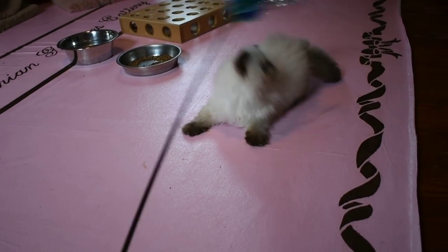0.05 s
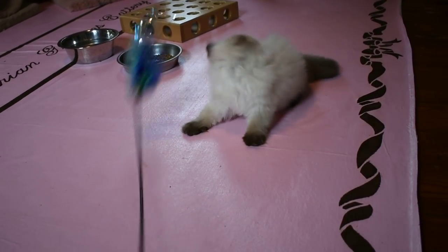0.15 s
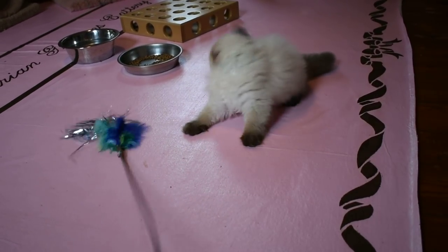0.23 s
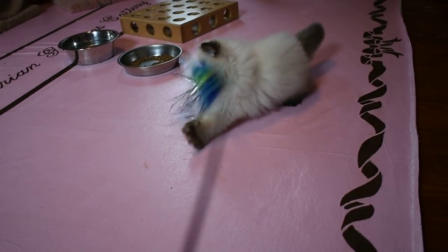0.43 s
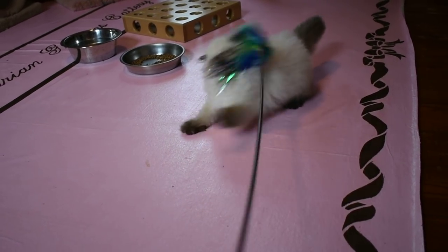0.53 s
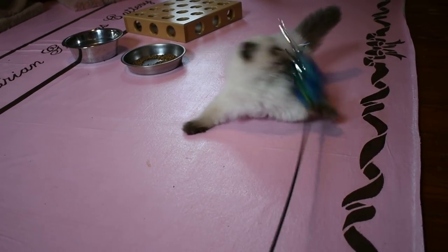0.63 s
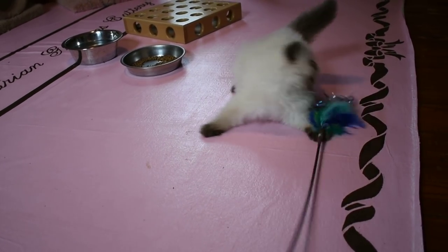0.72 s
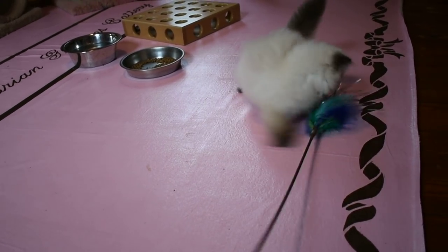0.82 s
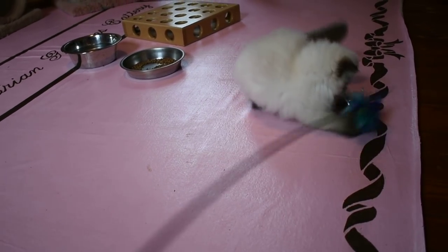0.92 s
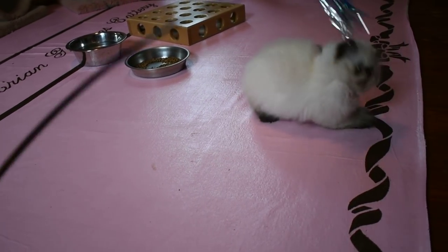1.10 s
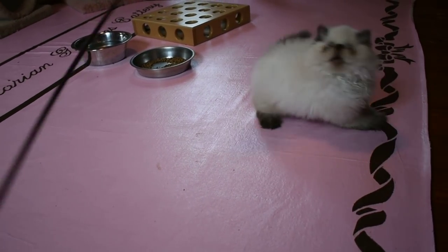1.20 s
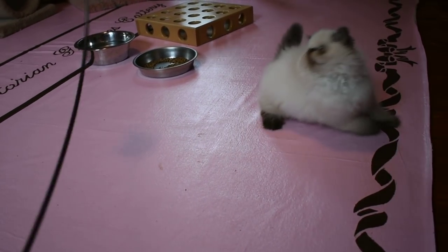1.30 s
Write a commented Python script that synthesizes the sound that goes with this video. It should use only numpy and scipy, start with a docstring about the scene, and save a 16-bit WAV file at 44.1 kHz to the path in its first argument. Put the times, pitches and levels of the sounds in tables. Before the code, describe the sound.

Close microphone in a small bare room: a cat wand toy lands with a sharp cracking smack, crisp foil rustles, quills scratch the mat with small snaps, soft paw thuds and a brief airy whoosh follow.

```python
"""A feather and tinsel cat toy on a thin rod slaps down on a plastic floor mat with hard snaps: short rings with cracks.
Its feathers land as puffs of noise, its tinsel fizzes with tiny ticks, and its quills scrape as ringing grit.
The toy also whips through the air as bands of noise. Soft low thuds are dull noise: two under the slap, the rest
like padded paws. The bare room adds an echo to each of these, over faint air noise, hums and a low rumble."""
import sys
import numpy as np
from scipy import signal
from scipy.fft import rfft, irfft, next_fast_len
from scipy.io import wavfile
from scipy.ndimage import map_coordinates

SR = 44100
rng = np.random.default_rng(int(sys.argv[2]) if len(sys.argv) > 2 else 0)


def generate_wav(signal):
    """Clip the signal to [-1, 1] and save it as 16-bit WAV at the path in sys.argv[1]."""
    frames = np.transpose(np.atleast_2d(signal))
    scaled = np.clip(frames, -1, 1) * 32767
    pcm = np.round(scaled).astype(np.int16)
    wavfile.write(sys.argv[1], SR, pcm)


N = 59535

# How long the echo takes to fall by 60 dB: [f/Hz, time/s]
ROOM_FADE_TIMES = [(100, 0.38), (300, 0.45), (800, 0.49), (3000, 0.47), (6000, 0.39), (14000, 0.4)]
ROOM_BUILD_S, ROOM_CHANGES_PER_S = 0.013, 60
TOP_HZ = 15800

# Tone colour of the room air: [f/Hz, level/dB]
AIR_COLOUR = [(25, -31), (60, -3.5), (150, -2), (240, 3), (340, 2), (500, -5.5), (1000, -6.5), (3000, -10),
              (9000, -12), (15000, -19)]
AIR_DB = -54
# Wavering low hums, one of them fading: [f/Hz, level at the start/dB, change of level/(dB per s)]
HUMS = [(102.5, -62.5, -6.5), (233.6, -63, -0.5)]
# Loudness of the low rumble over time: [t/s, level/dB]
RUMBLE_LEVELS = [(0, -71), (.7, -72), (.85, -69), (1.25, -68), (1.35, -80)]
# Tone colour of the rumble: [f/Hz, level/dB]
RUMBLE_COLOUR = [(15, -17), (35, -12), (60, -2), (90, 5), (200, -38), (1000, -90)]

# Soft low thuds, two dull ones under the slap, the rest like padded paws: [t/s, level/dB, f/Hz]
THUDS = [(0.237, -33, 338), (0.297, -45, 328), (.541, -43, 226), (.568, -48.5, 324), (.63, -45.5, 353),
         (1.17, -71, 300), (1.199, -54, 213)]
# Tone colour of a thud: [multiple of its pitch, level/dB]
THUD_COLOUR = [(.15, -36), (.7, -16), (1, 6), (1.3, -11), (1.7, -11), (2.3, -12), (4, -13), (11, -34)]
THUD_RISE_S, THUD_DECAY_S, THUD_ROOM_DB = 0.003, 0.033, -1.5

# Swings through the air: [t of the loudest moment/s, width/s, level/dB, f/Hz, glide/(octaves per s)]
SWINGS = [(0.539, 0.012, -52, 790, -8), (0.994, 0.029, -42, 1380, 11), (1.189, 0.04, -53, 1210, 14)]
SWISH_OCTAVES, SWISH_ROOM_DB = 0.89, -2.5

# Quills scraping along the mat: [start t/s, t when the fall begins/s, level/dB, quill ring f/Hz]
SCRAPES = [(0.569, 0.583, -46, 4580), (0.587, 0.705, -55, 3400), (0.702, .717, -30.5, 3550),
           (0.715, 0.768, -35.5, 3230), (0.771, 0.8, -41, 3360), (0.796, 0.811, -33.5, 4200),
           (0.811, 0.831, -36, 3000), (0.836, 0.87, -36.5, 4020), (0.854, 0.988, -46, 3270),
           (0.923, .934, -41, 3520), (1.165, 1.195, -48.5, 4100), (1.192, 1.201, -43.5, 3940)]
# Tone colour of the scraping grit: [f/Hz, level/dB]
SCRAPE_COLOUR = [(40, -36), (200, -17), (450, -14.5), (700, -1.5), (1100, -6), (1700, -1.5), (2600, -3),
                 (5000, -2), (8500, -3), (12000, -13), (15500, -18)]
SCRAPE_RISE_S, SCRAPE_FALL_S, SCRAPE_ROOM_DB = 0.0022, 0.0037, -5
SCRAPE_PER_S, SCRAPE_SPREAD_DB = 4000, 2.5
QUILL_Q, QUILL_DB = 2.7, -2.5  # sharpness of the ring, and its level against the grit

# How hard the tinsel shakes over time: [t/s, level/dB]
TINSEL_LEVELS = [(0, -51), (.2, -54.5), (.216, -48), (.235, -48), (0.238, -36), (.278, -31.5), (.295, -39),
                 (.33, -46.5), (.365, -38), (.44, -48), (.48, -46), (.57, -43.5), (.595, -75), (.64, -67),
                 (.68, -49.5), (.745, -47), (.79, -51.5), (0.891, -59), (.91, -47.5), (1.02, -48.5),
                 (1.09, -52.5), (1.12, -52), (1.23, -51.5), (1.27, -64), (1.35, -55)]
# Tone colour of the tinsel: [f/Hz, level/dB]
TINSEL_COLOUR = [(300, -37), (2000, -6.5), (4500, -3.5), (8500, 2.5), (12500, 2.5), (15500, -8)]
TINSEL_PER_S, TINSEL_SPREAD_DB, TINSEL_ROOM_DB = 7000, 7.5, -7

# The bundle of feathers slapping flat and settling: [t/s, level/dB, decay/s]
SLAPS = [(0.2363, -21, 0.013), (0.255, -28, 0.028), (0.297, -25.5, .004)]
# Tone colour of the feathers: [f/Hz, level/dB]
SLAP_COLOUR = [(30, -46), (90, -15.5), (170, -3), (230, 0), (340, 4), (490, 0), (800, 5.5), (1200, -1.5),
               (1800, 1), (3200, -2.5), (5000, -12), (15000, -23)]
SLAP_RISE_S, SLAP_ROOM_DB = 0.00035, -0.5

# Hard parts of the toy snapping on the mat: [t/s, level/dB, ring f/Hz, crack level against the ring/dB]
SNAPS = [(0.119, -15, 10000, -3), (0.123, -15.5, 9150, -10), (0.213, -22, 11500, -13),
         (0.2403, -1, 6700, -3.5), (.2457, -10, 3770, 5), (.2552, 7, 3310, -9.5), (.2739, 1, 2950, -6),
         (.2829, -5, 8600, -7), (.6990, -20, 3900, -19), (0.705, -8, 5100, -12), (.7080, -7, 3820, -24),
         (0.7118, -12.5, 3460, -26), (0.7155, -27, 4000, -14), (.8485, -22, 4400, 1),
         (0.854, -10, 3850, -27), (0.862, -17, 4250, -1), (0.8646, -8, 4860, -4.5), (0.866, -16, 3900, -15)]
SNAP_RISE_S, CRACK_S, SNAP_ROOM_DB = 0.00004, 0.00015, -9.5
SNAP_CYCLES = 0.87  # decay time of the ring, in cycles
SNAP_LOW_SHARE = 0.37  # bass is cut below this share of the ring pitch


def amp(db):
    """Turn decibels into a gain."""
    return 10 ** (np.asarray(db) / 20)


def unit(x):
    """Scale a sound to an average strength (rms) of 1."""
    return x / np.sqrt(np.mean(x ** 2) + 1e-20)


def clock():
    """Give the time of each sample in seconds."""
    return np.arange(N) / SR


def level_curve(points):
    """Join (time, dB) points with straight lines and give the gain at each sample."""
    return amp(np.interp(clock(), *np.transpose(points)))


def along(points, hz):
    """Read a value between (Hz, value) points on a log frequency axis."""
    f, v = np.transpose(points)
    return np.interp(np.log(hz + 1), np.log(f + 1), v)


def filtered(x, response):
    """Make each frequency of x louder or softer by the response."""
    size = next_fast_len(N + 8192)
    spectrum = rfft(x, size) * response(np.fft.rfftfreq(size, 1 / SR))
    return irfft(spectrum, size)[:N]


def coloured(x, colour):
    """Give x a tone colour, at rms 1."""
    return unit(filtered(x, lambda hz: amp(along(colour, hz))))


def noise(colour):
    """Make smooth noise with a tone colour."""
    return coloured(rng.standard_normal(N), colour)


def crackle(colour, per_s, spread_db):
    """Scatter many tiny contacts of random size and direction, with a tone colour."""
    hits = rng.random(N) < per_s / SR
    direction = np.sign(rng.standard_normal(N))
    size = amp(spread_db * rng.standard_normal(N))
    return coloured(hits * direction * size, colour)


def wobble(rate):
    """Make a smooth random curve through so many random points a second."""
    return map_coordinates(rng.standard_normal(256), [clock() * rate], mode="wrap")


def burst(start, rise_s, decay_s, hold_s=0):
    """Shape the loudness: a quick rise, a hold, then a fading tail."""
    t = np.maximum(clock() - start, 0)
    rise = 1 - np.exp(-t / rise_s)
    return rise * np.exp(-np.maximum(t - hold_s, 0) / decay_s)


def in_room(x, room_db, count=3):
    """Add a spread-out echo that builds up, fades at its own pace in each pitch range and shifts at random."""
    hz, t, z = signal.stft(rng.standard_normal((count, SR // 2)), SR, nperseg=256)
    fade = amp(-60 * t / along(ROOM_FADE_TIMES, hz)[:, None])
    build = 1 - np.exp(-t / ROOM_BUILD_S)
    tails = signal.istft(z * fade * build, SR, nperseg=256)[1]
    tails = tails / np.linalg.norm(tails[0])
    # The sound is shared between the tails in ever-changing parts
    shares = np.array([wobble(ROOM_CHANGES_PER_S) for _ in tails])
    shares = shares / np.linalg.norm(shares, axis=0)
    echo = signal.fftconvolve(x * shares, tails, axes=1)
    return x + amp(room_db) * echo.sum(axis=0)[:N]


def room_tone(waver_db=1.9, drift_rad=0.47):
    """Mix faint air noise, wavering hums made of sine waves, and a low rumble of changing level."""
    hums = np.zeros(N)
    for hz, db, slope in HUMS:
        level = amp(db + slope * clock() + waver_db * wobble(7.2))
        phase = 2 * np.pi * hz * clock() + drift_rad * wobble(9.2)
        hums += level * np.sqrt(2) * np.sin(phase)  # the root of 2 gives the sine an rms of 1
    rumble = level_curve(RUMBLE_LEVELS) * noise(RUMBLE_COLOUR)
    return amp(AIR_DB) * noise(AIR_COLOUR) + hums + rumble


def thuds():
    """Each soft low thud is a short puff of noise gathered around a dull pitch."""
    out = np.zeros(N)
    for start, db, hz in THUDS:
        colour = np.array(THUD_COLOUR) * [hz, 1]  # multiples of the pitch become Hz
        out += amp(db) * burst(start, THUD_RISE_S, THUD_DECAY_S) * noise(colour)
    return in_room(out, THUD_ROOM_DB)


def swishes():
    """The rod sheds eddies (small swirls of air): a band of noise that glides up or down in pitch."""
    out = np.zeros(N)
    for peak, width, db, pitch, glide in SWINGS:
        hz, t, z = signal.stft(rng.standard_normal(N), SR, nperseg=512)
        glided = glide * np.clip(t - peak, -2 * width, 2 * width)
        octaves = np.log2((hz[:, None] + 1) / pitch) - glided  # distance from the middle of the band
        band = np.exp(-0.5 * (octaves / SWISH_OCTAVES) ** 2)
        band = band / np.linalg.norm(band, axis=0)
        air = unit(signal.istft(z * band, SR, nperseg=512)[1][:N])
        out += amp(db) * air * np.exp(-0.5 * ((clock() - peak) / width) ** 2)
    return in_room(out, SWISH_ROOM_DB)


def scrapes(uneven_db=1.0):
    """Quills catch and slip on the mat under uneven pressure; each slip rings the quill briefly."""
    pressure = amp(uneven_db * wobble(180))
    grit = crackle(SCRAPE_COLOUR, SCRAPE_PER_S, SCRAPE_SPREAD_DB) * pressure
    out = np.zeros(N)
    for start, end, db, hz in SCRAPES:
        ring = unit(signal.lfilter(*signal.iirpeak(hz, QUILL_Q, SR), grit))
        stroke = burst(start, SCRAPE_RISE_S, SCRAPE_FALL_S, end - start)
        out += amp(db) * stroke * unit(grit + amp(QUILL_DB) * ring)
    return in_room(out, SCRAPE_ROOM_DB)


def tinsel():
    """Foil strips tick against one another as the toy shakes."""
    ticks = crackle(TINSEL_COLOUR, TINSEL_PER_S, TINSEL_SPREAD_DB)
    return in_room(level_curve(TINSEL_LEVELS) * ticks, TINSEL_ROOM_DB)


def slaps(flutter_db=0.5):
    """The feathers land flat: a broad puff of noise that fills the room."""
    force = sum(amp(db) * burst(start, SLAP_RISE_S, decay) for start, db, decay in SLAPS)
    flutter = amp(flutter_db * wobble(200))
    return in_room(force * flutter * noise(SLAP_COLOUR), SLAP_ROOM_DB)


def snaps():
    """A hard part rings very briefly with a noisy crack at its front; the higher its ring, the less bass."""
    out = np.zeros(N)
    for start, db, hz, crack_db in SNAPS:
        tone = np.sin(2 * np.pi * hz * (clock() - start))
        ring = tone * burst(start, SNAP_RISE_S, SNAP_CYCLES / hz)
        crack = rng.standard_normal(N) * burst(start, SNAP_RISE_S, CRACK_S)
        bass_cut = signal.butter(2, SNAP_LOW_SHARE * hz, "high", fs=SR, output="sos")
        out += amp(db) * signal.sosfilt(bass_cut, ring + amp(crack_db) * crack)
    return in_room(out, SNAP_ROOM_DB)


def scene():
    """Mix room, thuds and toy at one microphone."""
    toy = swishes() + scrapes() + tinsel() + slaps() + snaps()
    return (room_tone() + thuds() + toy)[None]


def record(dry):
    """The recorder clips at full scale, then keeps nothing from its top frequency upward."""
    clipped = np.clip(dry[0], -1, 1)
    return filtered(clipped, lambda hz: hz < TOP_HZ)[None]


dry = scene()
out = record(dry)
generate_wav(out)
```